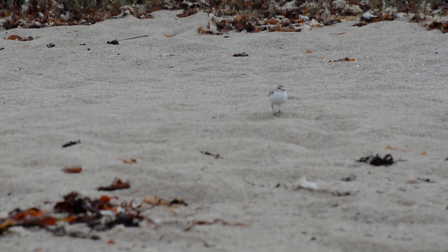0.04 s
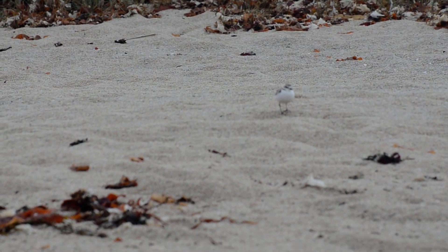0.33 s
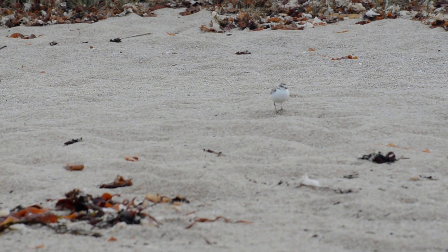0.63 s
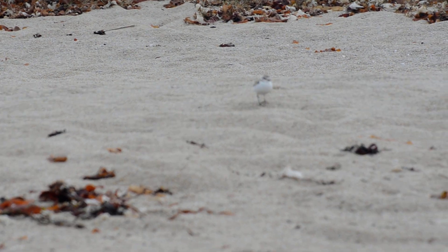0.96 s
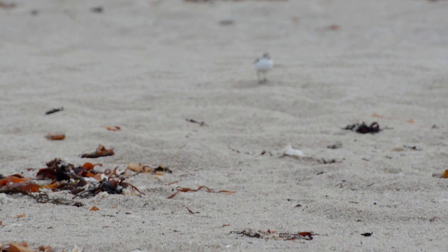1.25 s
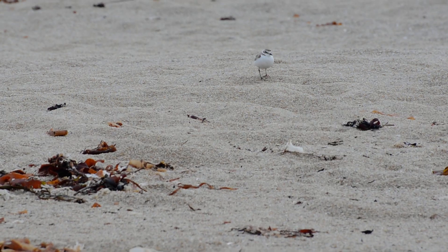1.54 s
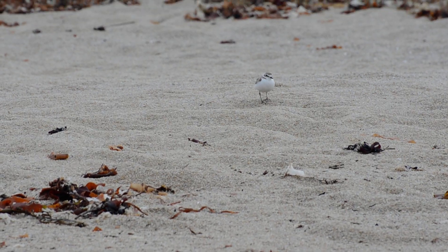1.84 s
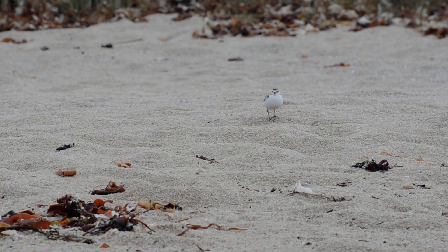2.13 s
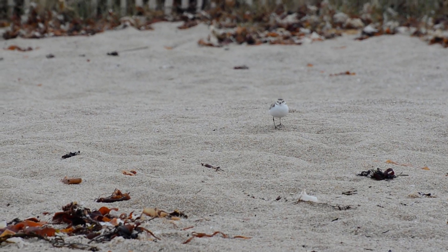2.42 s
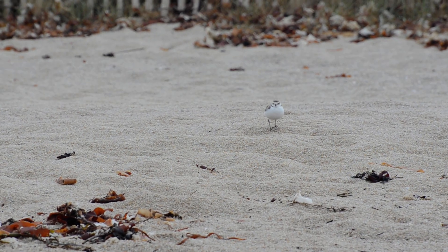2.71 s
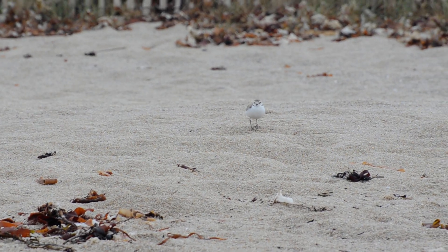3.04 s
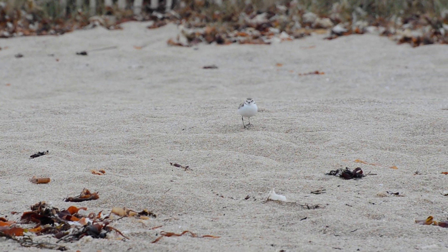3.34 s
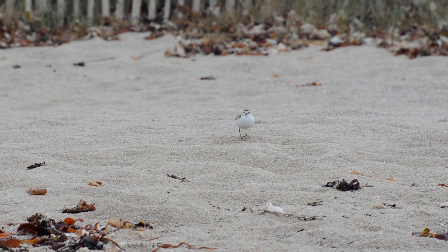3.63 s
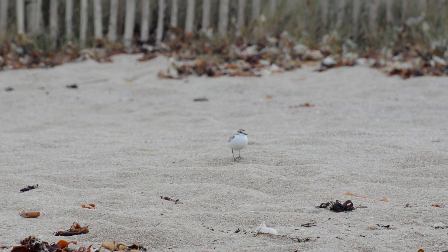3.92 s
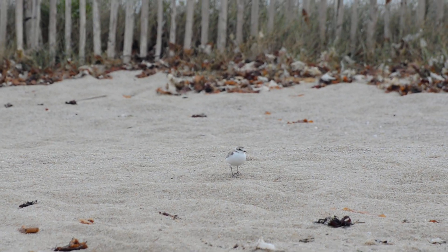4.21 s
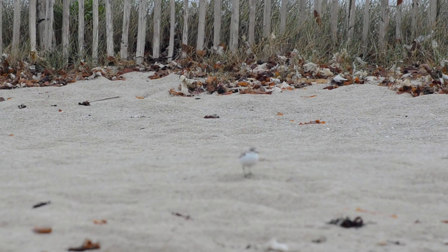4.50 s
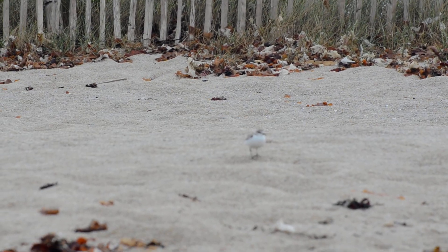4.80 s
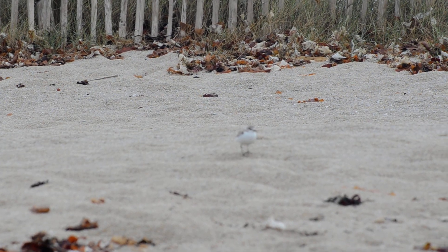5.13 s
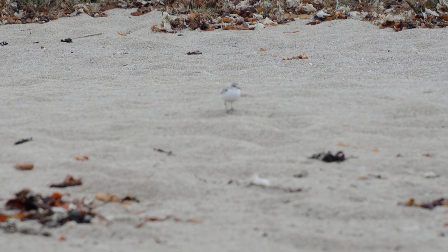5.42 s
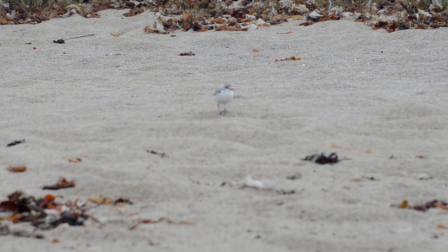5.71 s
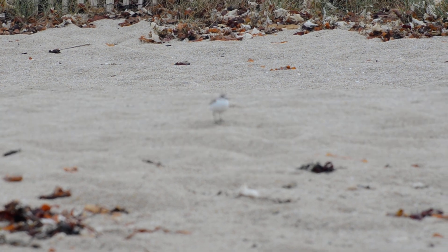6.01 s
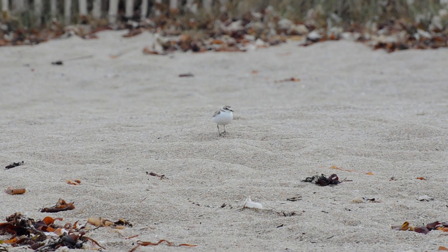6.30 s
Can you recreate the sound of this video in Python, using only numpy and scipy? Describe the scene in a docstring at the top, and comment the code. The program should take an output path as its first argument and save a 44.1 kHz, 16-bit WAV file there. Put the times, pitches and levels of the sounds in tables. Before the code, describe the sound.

Ocean surf washes steadily, heard from up a sandy beach on a hand-held microphone. About a second in, a wave splashes at the waterline, deepens to a roar and runs out in fizzing foam. A much smaller one follows near the end. A few short puffs of wind thump the microphone, early and again past the middle. Faint ticks and small slaps of water come through over the hiss of distant waves.

```python
"""A low wash of surf and a few puffs of wind, on a hand-held camera's microphone up a sandy beach.
Down at the waterline a wave splashes, deepens to a roar as its bubble clouds ring, and runs out
in fizzing foam; a smaller one follows. Far along the shore more waves merge into a hiss.
Faint ticks and small slaps of water come through, and the camera's electronics whine."""
import sys
import numpy as np
from scipy import signal
from scipy.fft import rfft, irfft
from scipy.io import wavfile

SR = 44100
rng = np.random.default_rng(int(sys.argv[2]) if len(sys.argv) > 2 else 0)


def wav_record(signal):
    """Record a signal, one row per channel, as 16-bit PCM in the file named by sys.argv[1]."""
    frames = np.transpose(np.atleast_2d(signal))
    bounded = np.clip(frames, -1, 1)
    # unit amplitude maps onto the largest positive 16-bit level
    quanta = np.round(bounded * 32767).astype(np.int16)
    wavfile.write(sys.argv[1], SR, quanta)


N = 280035
TIME = np.arange(N) / SR
FREQ = np.maximum(np.arange(N // 2 + 1) * SR / N, 1)


# the surf's colour from up the beach: (frequency [Hz], relative level [dB])
SURF_SPECTRUM = [(25, -38), (45, -22.5), (70, -14), (130, -8), (300, -1), (650, 1), (1100, -2),
                 (1900, -5.5), (2900, -12.5), (4300, -24.5), (6500, -29.5), (9000, -32), (11500, -41),
                 (14500, -59)]
# centres of the roar, crash, run-up and splash bubble clouds: (frequency [Hz])
CLOUD_CENTRES = [354, 725, 1360, 2420]

def surf(swells, level_db=-25.5, heave_db=0.3, churn_db=0.38, flicker_db=0.7, far_hz=110):
    """Bubble clouds ring at the waterline; the water heaves as one and each bubble size churns alone."""
    water = colour(rng.standard_normal(N) + 0.44 * bursts(per_s=3000, spread_db=5), SURF_SPECTRUM)
    out = 0
    for hz in 2 ** np.arange(4, 14.6, .5):  # half-octave bands
        band = irfft(water * np.maximum(1 - 2 * abs(np.log2(FREQ / hz)), 0), N)
        shares = [np.interp(np.log(hz), np.log(CLOUD_CENTRES), row) for row in np.eye(len(swells))]
        near = sum(share * swell for share, swell in zip(shares, swells))
        far = 1 / (1 + (hz / far_hz) ** 2)  # the whole shore's deep rumble hardly swells
        lumpy = 1 / (1 + hz / 2500)  # big clouds tumble in lumps, fine spray hisses evenly
        tumble = undb(lumpy * (churn_db * walk(6.5) + flicker_db * walk(24)))
        out = out + band * (far + (1 - far) * near) * tumble
    return unit(out * undb(heave_db * walk(7.4))) * undb(level_db)


# waves breaking down the beach from the microphone: (time [s], relative level [dB])
BREAKING_WAVES = [(1.0, 0), (4.98, -13)]
# stages of each wave: (delay [s], rise [s], fall [dB/s], relative crest [dB])
PLUNGE_STAGE = (0.047, 0.61, 15, 7.2)  # the lip falls ahead of the main crash
CRASH_STAGE = (0.56, 0.83, 9.2, 8.4)
ROAR_STAGE = (0, 1.24, 11, 9.5)
RUN_UP_STAGE = (.29, 1.2, 4.4, 6.4)
SPLASH_STAGE = (0.05, 1, 4.5, 7)

def breakers():
    """Swell of each bubble cloud: a wave sprays, plunges, crashes and roars, then runs up the sand."""
    roar = surge(BREAKING_WAVES, *ROAR_STAGE)
    crash = surge(BREAKING_WAVES, *PLUNGE_STAGE) + surge(BREAKING_WAVES, *CRASH_STAGE)
    run_up = surge(BREAKING_WAVES, *RUN_UP_STAGE) + spray(crest_db=-0.5)
    splash = surge(BREAKING_WAVES, *SPLASH_STAGE) + spray(crest_db=8.5)
    clouds = zip(CLOUD_CENTRES, (roar, crash, run_up, splash))
    return [unit(np.sqrt(wash(hz) + power)) for hz, power in clouds]


def surge(events, delay_s, rise_s, fall_db_per_s, crest_db):
    """Power of moving water: after each event it builds smoothly, crests and drains away."""
    power = 0
    for s, db in events:
        age = TIME - s - delay_s
        build = np.sin(np.pi / 2 * np.clip(age / rise_s, 0, 1)) ** 2
        drained_db = fall_db_per_s * np.maximum(age - rise_s, 0)
        power = power + (build * undb(db + crest_db - drained_db)) ** 2
    return power


# sheets of water landing at the water's edge: (time [s], relative level [dB])
SAND_SLAPS = [(.83, -0.5), (2.74, -4), (3.25, -7.5), (5.0, -9)]

def spray(crest_db):
    """Power of the short, bright spray thrown up as water slaps the sand."""
    return surge(SAND_SLAPS, delay_s=0, rise_s=0.65, fall_db_per_s=40, crest_db=crest_db)


# low end of the wash in the shallows: (time [s], relative level [dB])
LOW_WASH = [(0, -7), (.6, -3), (1.1, -2), (3.8, -1), (5.0, 1.7), (6.35, 4.7)]

def wash(hz, corner_hz=810):
    """Power of the water between waves: its low end builds slowly, its treble stays nearly level."""
    low_db = np.interp(TIME, *np.transpose(LOW_WASH))
    return undb(low_db / (1 + (hz / corner_hz) ** 2)) ** 2


# colour of the foam on the sand: (frequency [Hz], relative level [dB])
FOAM_SPECTRUM = [(4000, -35), (4500, -15), (5100, 0), (6200, -2), (7700, 0.5), (9000, -5), (10500, -13),
                 (14000, -51)]
# each wave's white water: (delay [s], rise [s], fall [dB/s], relative crest [dB])
WHITE_WATER_STAGE = (.03, 1.18, 8.1, 12.2)

def foam(level_db=-44.5, growth=1.19, flicker_db=0.7):
    """Tiny bubbles burst in the white water, so densely that they merge into a sizzle."""
    white_water = np.sqrt(1 + surge(BREAKING_WAVES, *WHITE_WATER_STAGE) + spray(crest_db=9.5))
    swell = white_water ** growth  # the sizzle grows a little faster than the white water
    bubbles = rng.standard_normal(N) + 0.46 * bursts(per_s=6700, spread_db=4)
    sizzle = irfft(colour(bubbles, FOAM_SPECTRUM), N)
    return unit(sizzle * swell * undb(flicker_db * walk(20))) * undb(level_db)


# gusts right on the microphone: (time [s], level [dB], half length [s])
MIC_GUSTS = [(.52, -42, 0.063), (0.944, -35, 0.056), (1.407, -38, .04), (2.07, -47, .1), (3.429, -34, .025),
             (3.533, -30.5, .03), (3.688, -39, 0.032), (3.795, -29, 0.027)]
# sharp eddies inside them: (time [s], strength [dB], pitch [Hz])
MIC_EDDIES = [(.523, -23.5, 80), (.572, -24, 120), (.910, -14.5, 105), (0.965, -11.5, 163),
              (.982, -15, 150), (3.449, -14, 240), (3.536, -18, 120), (3.794, -6.5, 203)]

def wind(rumble_hz=(30, 150), decay_cycles=0.31):
    """Gusts swell and fade as a low rumble; each eddy pushes, then pulls the air at the microphone."""
    low_band = signal.butter(2, rumble_hz, "band", fs=SR, output="sos")
    rumble = unit(signal.sosfilt(low_band, rng.standard_normal(N)))
    gusts = sum(undb(db) * np.exp(-((TIME - s) / half_s) ** 2) for s, db, half_s in MIC_GUSTS)
    eddies = 0
    for s, db, hz in MIC_EDDIES:
        cycles = hz * (TIME - s)  # big eddies are low and slow
        eddies = eddies - undb(db) * np.sin(2 * np.pi * cycles) * np.exp(-abs(cycles) / decay_cycles)
    return gusts * rumble + eddies


# faint ticks and small slaps of water: (time [s], relative level [dB], knock over ring [dB])
TICKS_AND_SLAPS = [(0.647, -34, 6), (.667, -39.5, 18), (.777, -38, 10), (0.803, -40.5, 16),
                   (1.023, -34.5, 7), (1.223, -41, 16), (1.281, -35, 4), (3.862, -32.5, 7), (3.990, -36, 9),
                   (4.012, -38, 9), (4.131, -38, 4), (4.524, -35.5, -2), (4.553, -37, 16.5),
                   (5.71, -37, 16), (5.779, -36, 1), (5.923, -34.5, 0)]
# modes of their bright ring: (multiple of the ring pitch, width [Hz], relative level [dB])
RING_MODES = [(1, 1500, 8), (1.2, 1800, 1), (1.8, 4200, -5)]

def ticks_and_slaps(ring_hz=4420, knock_hz=900, decay_s=0.0053, gain_db=2, soft_hz=11000):
    """Faint ticks and small slaps of water: each is a short bright ring with a hollow knock."""
    t, out = TIME[:SR // 20], np.zeros(N)
    for s, db, knock_db in TICKS_AND_SLAPS:
        noise = rng.standard_normal(len(t))
        ring = sum(undb(mode_db) * mode(noise, ring_hz * ratio, width_hz)
                   for ratio, width_hz, mode_db in RING_MODES)
        knock = undb(knock_db) * unit(mode(noise, knock_hz, width_hz=500))
        start = int(s * SR)
        out[start:start + len(t)] += undb(db + gain_db) * (unit(ring) + knock) * np.exp(-t / decay_s)
    # the low-pass rounds the onsets
    return signal.sosfilt(signal.butter(3, soft_hz, fs=SR, output="sos"), out)


# colour of the surf far along the shore: (frequency [Hz], relative level [dB])
DISTANT_SPECTRUM = [(1500, -13), (3000, 2.5), (4100, 3), (5000, -1.5), (6500, -16), (9000, -6),
                    (14000, -33)]

def distant_shore(level_db=-50.5):
    """Many distant waves reach the microphone as one smooth hiss."""
    hiss = irfft(colour(rng.standard_normal(N), DISTANT_SPECTRUM), N)
    return unit(hiss) * undb(level_db)


def bursts(per_s, spread_db):
    """Countless bubble bursts of unequal size, rms 1."""
    bursting = rng.random(N) < per_s / SR
    pops = bursting * rng.standard_normal(N)
    size_db = spread_db * np.minimum(rng.exponential(size=N), 3)
    return unit(pops * undb(size_db))


def walk(rate):
    """Smooth random drift, rms 1, that moves about rate times a second."""
    return unit(irfft(rfft(rng.standard_normal(N)) / (1 + (FREQ / rate) ** 2), N))


def colour(x, points):
    """Spectrum of x shaped by (frequency [Hz], level [dB]) points."""
    hz, db = np.transpose(points)
    return rfft(x) * undb(np.interp(np.log(FREQ), np.log(hz), db))


def mode(x, hz, width_hz):
    """Two resonances in series pass only a narrow range round one pitch."""
    return resonance(resonance(x, hz, width_hz), hz, width_hz)


def resonance(x, hz, width_hz):
    """Two-pole band-pass, gain 1 at the centre."""
    return signal.lfilter(*signal.iirpeak(hz, hz / width_hz, fs=SR), x)


def undb(db):
    """Decibels to gain."""
    return 10 ** (np.asarray(db) / 20)


def unit(x):
    """Scale to rms 1."""
    return x / np.sqrt(np.mean(x ** 2))


def scene():
    """Water down the beach, wind up close and faint ticks, all at one microphone."""
    return (surf(breakers()) + foam() + distant_shore() + wind() + ticks_and_slaps())[None]


# narrow dips of the microphone port: (frequency [Hz], width [Hz], depth [0-1])
PORT_NOTCHES = [(5700, 580, 0.8), (6980, 190, 0.6)]

def record(dry, whine_hz=15676, whine_db=-76, top_hz=15850, opens_s=0.036):
    """The port notches the treble, the electronics add a thin whine, and the top is cut."""
    for hz, width_hz, depth in PORT_NOTCHES:
        dry = dry - depth * resonance(dry, hz, width_hz)
    whine = undb(whine_db) * unit(np.sin(2 * np.pi * whine_hz * TIME))
    mic_open = TIME > opens_s  # a moment after the camera starts
    top_cut = signal.ellip(10, .2, 70, top_hz, fs=SR, output="sos")
    return signal.sosfilt(top_cut, (dry + whine) * mic_open)


dry = scene()
out = record(dry)
wav_record(out)
```